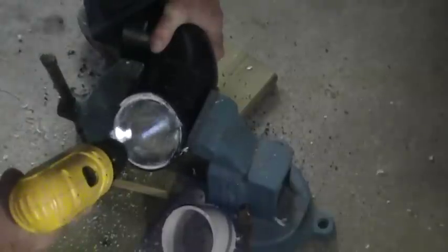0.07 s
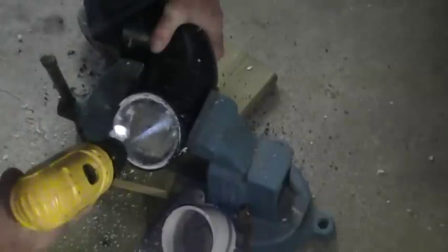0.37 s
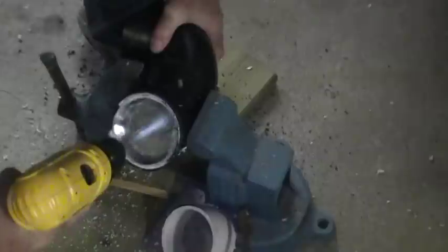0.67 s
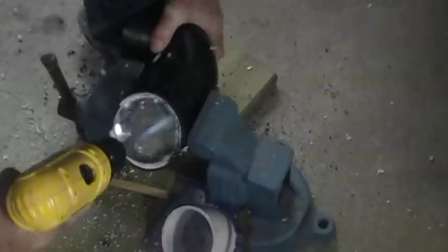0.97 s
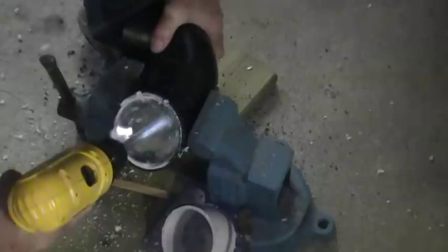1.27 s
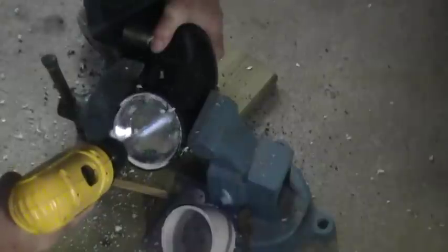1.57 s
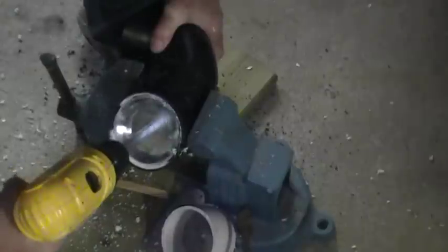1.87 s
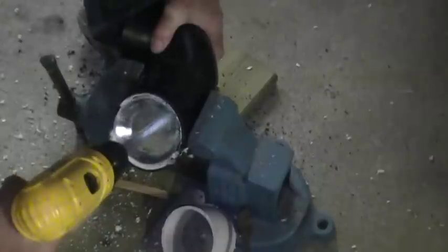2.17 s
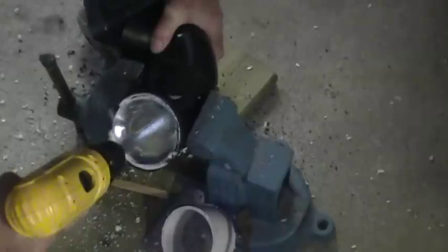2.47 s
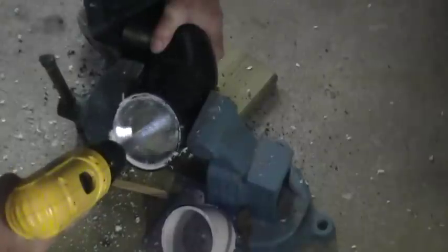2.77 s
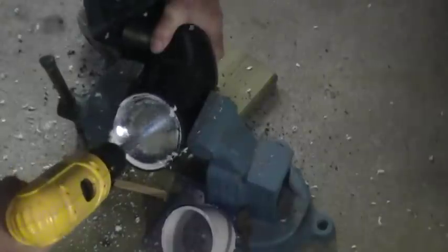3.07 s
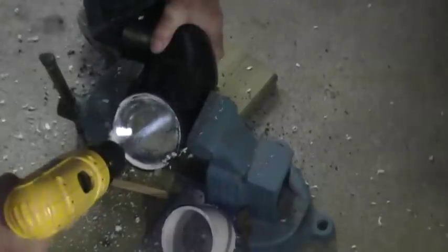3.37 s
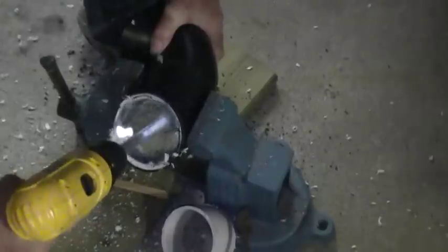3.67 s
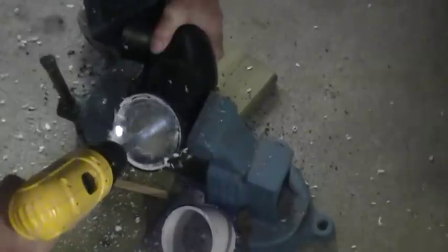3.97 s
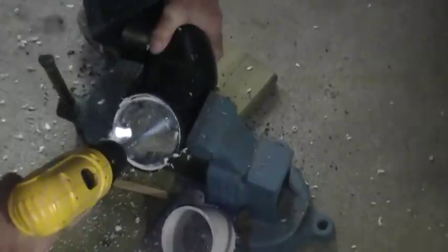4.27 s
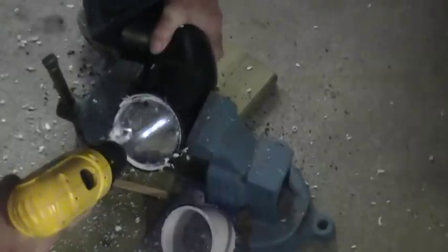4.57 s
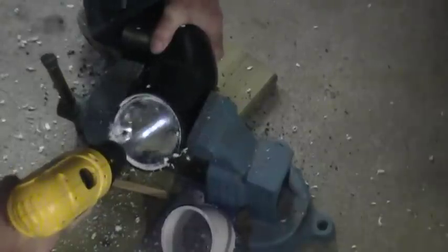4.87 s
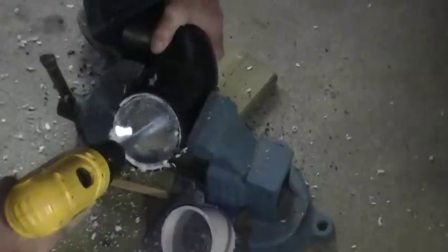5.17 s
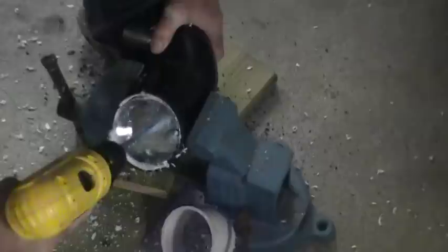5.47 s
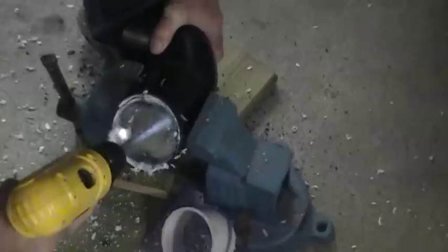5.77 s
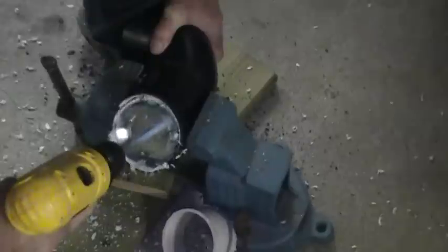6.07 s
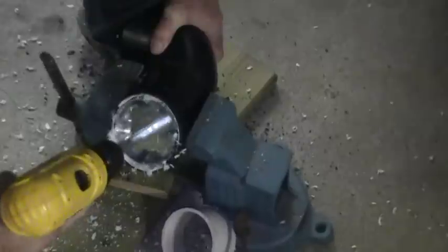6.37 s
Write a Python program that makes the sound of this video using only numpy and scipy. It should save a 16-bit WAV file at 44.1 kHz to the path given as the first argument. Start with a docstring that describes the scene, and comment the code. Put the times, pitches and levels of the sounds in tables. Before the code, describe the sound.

A power drill's toothed cutter grinds plastic pipe out of a fitting, with continuous scraping, rapid cracking bites and brief squawks.

```python
"""A drill-driven toothed cutter reams plastic pipe out of a fitting held in a vice, in a garage.
Runs of hard bites crack off chips and ring the fitting; lighter catches fill the gaps.
The teeth scrape without a break and at times drag, making the plastic squawk.
Towards the end the cutter chatters round the socket and the bites come in an even rattle.
A faint low hum lies underneath."""
import sys
import numpy as np
from scipy import signal
from scipy.fft import rfft, irfft, next_fast_len
from scipy.io import wavfile

SR = 44100
rng = np.random.default_rng(int(sys.argv[2]) if len(sys.argv) > 2 else 0)


def master(y):
    """Save y as 16-bit WAV."""
    cut = np.clip(np.atleast_2d(y).T, -1, 1)
    pcm = np.round(cut * 32767)  # scale
    wavfile.write(sys.argv[1], SR, pcm.astype(np.int16))


N = 291493
TIME = np.arange(N) / SR
BITE_S = .006  # bite levels are rms over this span


# runs of hard bites: (first bite [s], last bite [s], count, relative knock [dB], relative crack [dB])
BITE_RUNS = [(0.027, .0274, 1, -16, -26), (0.1352, .1349, 1, -16, -21), (.207, .251, 3, -16, -25),
             (0.3401, .3399, 1, -13.5, -20), (0.521, .5212, 1, -15, -24.5),
             (0.6154, .6337, 2, -14.5, -22.5), (0.7266, .8378, 7, -15, -22), (0.9586, .9588, 1, -13, -29),
             (1.077, 1.0769, 1, -11.5, -19), (1.1745, 1.1946, 2, -13, -21), (1.25, 1.25, 1, -15, -20),
             (1.3429, 1.3427, 1, -14, -26), (1.4266, 1.4963, 4, -13.5, -23),
             (1.5564, 1.5824, 2, -12, -20.5), (1.7428, 1.8371, 5, -13.5, -22),
             (2.0136, 2.0804, 4, -12.5, -21), (2.2256, 2.2662, 3, -13.5, -20.5),
             (2.484, 2.5823, 6, -14.5, -21), (2.6655, 2.6656, 1, -15, -20), (2.753, 2.7705, 2, -15.5, -22),
             (3.0001, 3.0005, 1, -16.5, -22), (3.3348, 3.3938, 4, -16, -20.5), (3.464, 3.4645, 1, -15, -22),
             (3.5377, 3.5866, 3, -13, -21.5), (3.6797, 3.706, 2, -14.5, -23),
             (3.8065, 3.8509, 3, -15, -20.5), (3.9822, 3.9815, 1, -16.5, -30),
             (4.1573, 4.1779, 2, -12.5, -26), (4.2222, 4.2549, 2, -13.5, -19.5),
             (4.3958, 4.443, 3, -15, -24.5), (4.5798, 4.663, 4, -14, -22), (4.7386, 4.9304, 9, -14, -23.5),
             (4.9814, 5.1876, 9, -15.5, -21.5), (5.297, 5.7749, 19, -15, -21),
             (5.8296, 5.9472, 5, -15, -22), (5.9785, 6.4145, 15, -16, -23.5),
             (6.4405, 6.5825, 6, -14.5, -19)]

def hard_bites(force_spread_db=.5, brittle_spread_db=1.26, weak_knock_db=-2.5, weak_crack_db=-4):
    """The cutter digs in and hammers evenly, strong and weak in turn: (time [s], knock [dB], crack [dB])."""
    rows = []
    for first_s, last_s, count, knock_db, crack_db in BITE_RUNS:
        for k, time_s in enumerate(np.linspace(first_s, last_s, round(count))):
            force_db, brittle_db = rng.standard_normal(2) * (force_spread_db, brittle_spread_db)
            weak = k % 2
            rows.append((time_s, knock_db + force_db + weak * weak_knock_db,
                         crack_db + force_db + brittle_db + weak * weak_crack_db))
    return np.array(rows)


# pace of the teeth between runs: (time [s], catch rate [1/s])
CATCH_RATE = [(.8, 50), (1.4, 42), (2.5, 49), (3.2, 51.2), (3.5, 42), (4.5, 43), (6.3, 33)]

def light_bites(spread_db=1.8, jitter_s=.0012):
    """Between runs the teeth catch as hard as the feed allows: (time [s], knock [dB], crack [dB])."""
    firsts_s, lasts_s = np.transpose(BITE_RUNS)[:2]
    starts_s, ends_s = lasts_s[:-1], firsts_s[1:]
    rates_hz = np.interp(starts_s, *np.transpose(CATCH_RATE))
    steps = np.rint((ends_s - starts_s) * rates_hz).astype(int)
    times_s = np.concatenate([np.linspace(a, b, n + 1)[1:-1] for a, b, n in zip(starts_s, ends_s, steps)])
    late, force, brittle = rng.standard_normal((len(times_s), 3)).T
    knock_db = feed_db(times_s) - .1 + spread_db * force
    crack_db = feed_db(times_s) - 4.55 + spread_db * (force + brittle) / 2
    return np.c_[times_s + jitter_s * late, knock_db, crack_db]


# broad spectrum of a bite: (frequency [Hz], relative level [dB])
BITE_SPECTRUM = [(50, -37), (150, -35.5), (520, -14.5), (740, -7), (980, -4), (1250, 0.5), (1850, -2),
                 (2100, -6), (3400, -4.5), (3900, -9), (8500, -8.5), (10400, -16.5), (11600, -30.5),
                 (15500, -45)]

def bites(teeth, knock_trim_db=-.86, crack_trim_db=-2, knock_early_s=.0006, crack_early_s=.001):
    """Each tooth that catches knocks the fitting and cracks a chip off."""
    lead_s = .008
    body, chip = fitting(BITE_SPECTRUM)
    out = np.zeros(N)
    for time_s, knock_db, crack_db in teeth:
        knock_force = fracture(lead_s, rise_s=.0027, fall_s=.0046, snap=.38, spread_db=2)
        crack_force = fracture(lead_s, rise_s=.0014, fall_s=.0031, snap=.64, spread_db=7.5)
        knock = unit(signal.fftconvolve(knock_force, body))
        crack = unit(signal.fftconvolve(crack_force, chip))
        add(out, time_s - knock_early_s - lead_s, amp(knock_db + knock_trim_db) * knock)
        add(out, time_s - crack_early_s - lead_s, amp(crack_db + crack_trim_db) * crack)
    return out * np.sqrt(BITE_S * SR)


def fracture(lead_s, rise_s, fall_s, snap, spread_db):
    """Force of one bite: tiny cracks crowd up to the break of the chip and thin out after it."""
    t = np.arange(-lead_s, 2 * lead_s, 1 / SR)
    swell = np.exp(np.where(t < 0, t / rise_s, -t / fall_s))
    cracks, size = rng.standard_normal((2, len(t)))
    force = unit(swell * cracks * amp(spread_db * size))
    force[np.argmin(abs(t))] -= snap
    return force


# resonances of fitting, cutter and vice: (frequency [Hz], width [Hz], boost [dB])
FITTING_MODES = [(209.6, 9.8, 10), (349, 22, 8), (412, 20, 6), (619, 69, 6), (757, 26.6, 11.5),
                 (796, 29, 5), (851.3, 12, 10), (890, 6.8, 11.5), (1070, 50, 2.5), (1323, 108, 5),
                 (1437, 35, 5), (1518, 27, 9.5), (1608, 46, 9), (1750, 65, 10), (1822, 107, 11.5),
                 (1923, 47, 7.5), (2370, 43, 2.5), (2615, 24, 4.5), (2885, 86, 5), (3178, 88, 7.5),
                 (3332, 147, 9), (4335, 66, 1)]

def fitting(spectrum, split_hz=4630, size=8192):
    """Responses to one crack: the ringing body below the split, the snap of the chip above."""
    hz = np.fft.rfftfreq(size, 1 / SR)
    peaks = sum(amp(db) ** 2 / (1 + (2 * (hz - mode_hz) / width_hz) ** 2)
                for mode_hz, width_hz, db in FITTING_MODES)
    gain = amp(at_hz(spectrum, hz)) * np.sqrt(1 + peaks)
    body_share = 1 / (1 + (hz / split_hz) ** 10)
    return [minimum_phase(gain * np.sqrt(share)) for share in (body_share, 1 - body_share)]


# modes damped by the pipe: (frequency [Hz], width [Hz], gain when clear [dB])
SOCKET_MODES = [(2610, 35, -1), (3300, 135, -3), (4200, 70, 1), (5168, 89, 1)]
# pipe cut away: (time [s], share [0-1])
CLEARED_SHARE = [(2.9, 0), (4.5, 1)]

def freed_ring(knocking):
    """Bites ring the fitting more freely as the pipe is cut away."""
    ringing = sum(amp(db) * resonate(knocking, hz, width_hz) for hz, width_hz, db in SOCKET_MODES)
    return ringing * np.interp(TIME, *np.transpose(CLEARED_SHARE))


# cutter pressure as scraping level: (time [s], relative level [dB])
FEED_LEVEL = [(0.0, -19.5), (0.24, -18.5), (0.29, -24), (0.75, -19.5), (1.81, -21.5), (1.95, -23.5),
              (2.05, -20), (2.14, -24.5), (2.17, -20.5), (2.57, -19.0), (2.62, -24), (3.01, -18.5),
              (3.04, -22.5), (3.25, -19.5), (3.31, -25.5), (3.36, -20.5), (3.59, -22.5), (4.2, -20.5),
              (4.3, -25), (4.44, -19.5), (4.47, -23), (4.68, -19), (4.94, -25.0), (5.6, -23), (6.58, -23.5),
              (6.6, -29)]

def feed_db(time_s):
    """Pressure on the pipe builds, then drops as a strip gives way."""
    return np.interp(time_s, *np.transpose(FEED_LEVEL))


# broad spectrum of the scraping: (frequency [Hz], relative level [dB])
SCRAPE_SPECTRUM = [(50, -45), (150, -30.5), (520, -13.5), (740, -10), (980, -3.5), (1250, 0.5),
                   (1850, -9.5), (2100, -3.5), (3400, -8.5), (3900, -6), (8500, -2), (10400, -9.5),
                   (11600, -18.5), (15500, -36.5)]

def scrape(rub_db=-2, fizz_db=-9, pressure_spread_db=2.05, grit_db=2, grain_db=5.5):
    """Dense micro-cracks under the sliding teeth, clumped by uneven pressure and by grit."""
    pressure_db = pressure_spread_db * wander(rate_hz=31)
    out = np.zeros(N)
    for level_db, response in zip((rub_db, fizz_db), fitting(SCRAPE_SPECTRUM)):
        cracks, size = rng.standard_normal((2, N))
        clumps_db = pressure_db + grit_db * wander(rate_hz=960) + grain_db * size
        force = unit_rms(cracks * amp(clumps_db))
        out += ring(force * amp(feed_db(TIME) + level_db), response)
    return out


def shavings(teeth, trim_db=-4, pitch_range_hz=(6200, 9200), width_hz=2600, zip_sigma_s=.0032):
    """Each tooth tears off a shaving in a short zip at its own pitch."""
    t = np.arange(-4 * zip_sigma_s, 4 * zip_sigma_s, 1 / SR)
    swell = np.exp(-(t / zip_sigma_s) ** 2 / 2)
    out = np.zeros(N)
    for time_s, _, crack_db in teeth:
        hz = rng.uniform(*pitch_range_hz)
        tearing = swell * rng.standard_normal(len(t))
        tear = unit(resonate(resonate(tearing, hz, width_hz), hz, width_hz))
        add(out, time_s + t[0], amp(crack_db + trim_db) * tear)
    return out * np.sqrt(BITE_S * SR)


# dragging teeth: (start [s], end [s], pitch [Hz], level [dB])
TOOTH_DRAGS = [(0, 0.293, 1323, -26), (2.028, 2.42, 1135, -32), (2.119, 2.62, 2925, -34),
               (2.68, 2.9, 1300, -26.5), (3.721, 4.14, 1350, -28)]

def squawks(width_hz=130, stutter_db=5.5):
    """A tooth drags: stuttering friction feeds one resonance of the plastic for a moment."""
    stutter = amp(stutter_db * np.minimum(wander(rate_hz=41), 2))
    out = np.zeros(N)
    for start_s, end_s, hz, level_db in TOOTH_DRAGS:
        friction = (stutter * rng.standard_normal(N))[round(start_s * SR):round(end_s * SR)]
        tone = unit_rms(resonate(resonate(friction, hz, width_hz), hz, width_hz))
        add(out, start_s, amp(level_db) * tone * signal.windows.tukey(len(tone), alpha=.21))
    return out


def spray(below_feed_db=22.5):
    """Fine chips fly off all round in a thin fizz."""
    ticks = np.diff(rng.standard_normal(N + 2), 2)  # the finest chips tick highest
    _, chip = fitting(SCRAPE_SPECTRUM)
    return unit_rms(ring(ticks, chip)) * amp(feed_db(TIME) - below_feed_db)


# ring time of the garage: (frequency [Hz], t60 [s])
GARAGE_T60 = [(200, 0.17), (1500, 0.26), (12000, 0.036)]

def garage(direct):
    """The walls return a short tail, strongest in the bass."""
    spectrum_hz_db = [(200, -4.5), (1500, -15), (8000, -16)]
    return ring(direct, reflections(GARAGE_T60, spectrum_hz_db, delay_s=.006))


# near reflections: (frequency [Hz], level re direct sound [dB])
SCATTER_SPECTRUM = [(60, -40), (200, -18), (1300, -19), (2400, -14), (9000, -13), (14000, -3)]

def bench_scatter(direct):
    """Near reflections that differ between the two microphones."""
    t60_hz_s = [(200, .18), (8000, .14)]
    return ring(direct, reflections(t60_hz_s, SCATTER_SPECTRUM, delay_s=.0003))


def reflections(t60, spectrum, delay_s):
    """A delayed diffuse tail whose bands die at their own speed."""
    hz, t, bands = signal.stft(rng.standard_normal(SR // 2), SR, nperseg=256)
    gain = amp(at_hz(spectrum, hz))
    bands *= amp(-60 * t / at_hz(t60, hz)[:, None])
    bands *= gain[:, None] / np.linalg.norm(bands, axis=1, keepdims=True)
    tail = unit(signal.istft(bands, SR, nperseg=256)[1]) * np.sqrt(np.mean(gain ** 2))
    return np.r_[np.zeros(round(delay_s * SR)), tail]


# faint hum: (frequency [Hz], level [dB])
HUM_TONES = [(84, -79.5), (205, -66)]

def hum(pitch_spread=.03, flutter_db=3):
    """Low tones that waver a little in pitch and level."""
    out = np.zeros(N)
    for hz, level_db in HUM_TONES:
        cycles = np.cumsum(hz * (1 + pitch_spread * wander(rate_hz=9))) / SR
        flutter = amp(flutter_db * wander(rate_hz=6))
        out += amp(level_db) * unit_rms(np.sin(2 * np.pi * cycles) * flutter)
    return out


def amp(db):
    """Decibels to gain."""
    return 10 ** (np.asarray(db) / 20)


def unit(x):
    """Scales to energy 1."""
    return x / np.sqrt(np.sum(x ** 2) + 1e-20)


def unit_rms(x):
    """Scales to rms 1."""
    return unit(x) * np.sqrt(len(x))


def at_hz(table, hz):
    """Interpolates a table over log frequency."""
    table_hz, values = np.transpose(table)
    return np.interp(np.log(hz + 1), np.log(table_hz), values)


def add(mix, time_s, sound):
    """Mixes a sound in at time_s."""
    part = mix[max(round(time_s * SR), 0):][:len(sound)]
    part += sound[:len(part)]


def ring(x, response):
    """Passes x through an impulse response."""
    return signal.oaconvolve(x, response)[:N]


def resonate(x, hz, width_hz):
    """One resonance of peak gain 1."""
    return signal.lfilter(*signal.iirpeak(hz, hz / width_hz, SR), x)


def minimum_phase(gain):
    """Causal impulse response of energy 1, shaped by a gain curve."""
    log_gain = np.log(gain + 1e-5)
    mirrored = np.r_[log_gain, log_gain[-2:0:-1]]
    spectrum = np.exp(np.conj(signal.hilbert(mirrored)))
    return unit(np.fft.ifft(spectrum).real[:len(mirrored) // 2])


def wander(rate_hz):
    """Smooth noise of rms 1 that moves up to rate_hz."""
    size = next_fast_len(N, real=True)
    hz = np.fft.rfftfreq(size, 1 / SR)
    spectrum = rfft(rng.standard_normal(size)) / (1 + (hz / rate_hz) ** 4)
    return unit_rms(irfft(spectrum, size)[:N])


def scene():
    """The cutter close and centred; bench and walls scatter its sound."""
    rubbing = squawks() + scrape()
    teeth = np.vstack([hard_bites(), light_bites()])
    knocking = bites(teeth)
    direct = knocking + freed_ring(knocking) + rubbing + shavings(teeth)
    side = bench_scatter(direct) + spray()
    mid = direct + garage(direct) + hum()
    return np.array([mid + side, mid - side])


def record(dry, ceiling=.92, low_cut_hz=60, high_cut_hz=15750):
    """The microphones round off the highest peaks and shed deep bass; then the band limit."""
    rounded = dry / (1 + (dry / ceiling) ** 10) ** .1
    thinned = signal.sosfilt(signal.butter(2, low_cut_hz, "high", fs=SR, output="sos"), rounded)
    low_pass = signal.firwin(511, high_cut_hz, window=("kaiser", 9), fs=SR)
    return signal.oaconvolve(thinned, low_pass[None], "same")


dry = scene()
out = record(dry)
master(out)
```